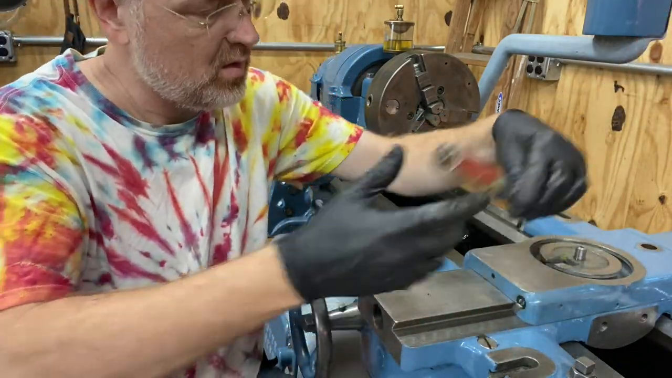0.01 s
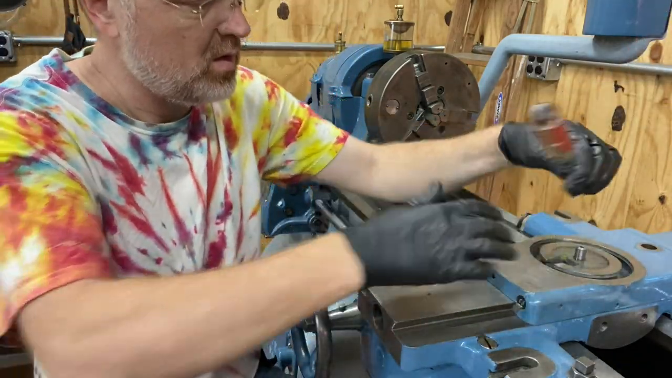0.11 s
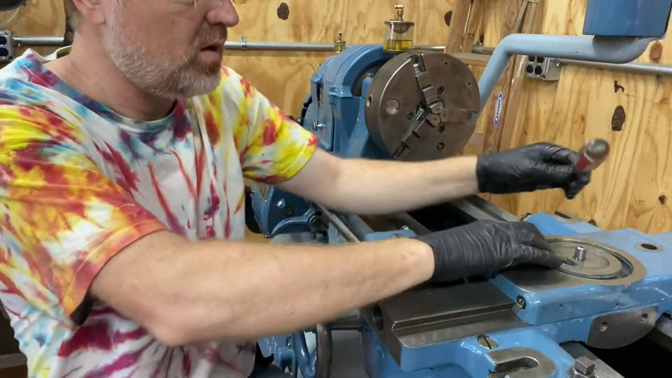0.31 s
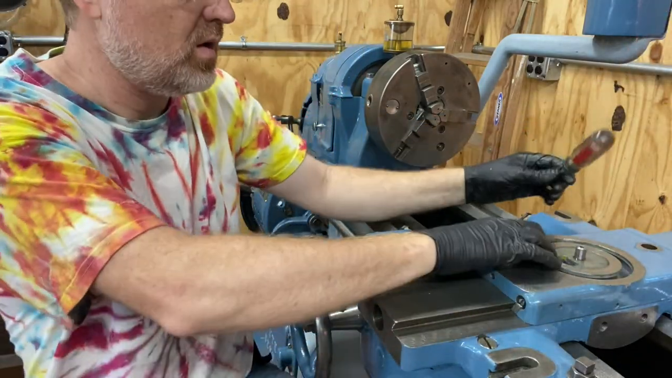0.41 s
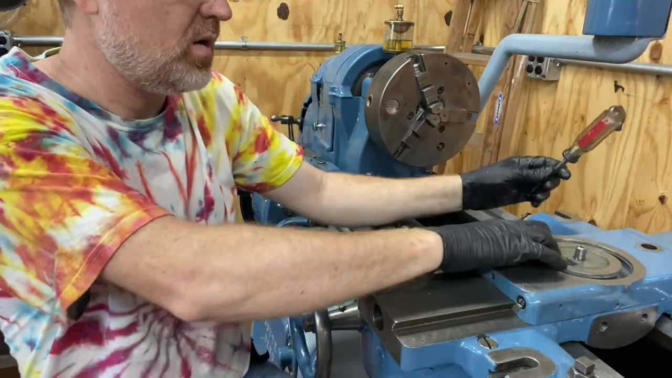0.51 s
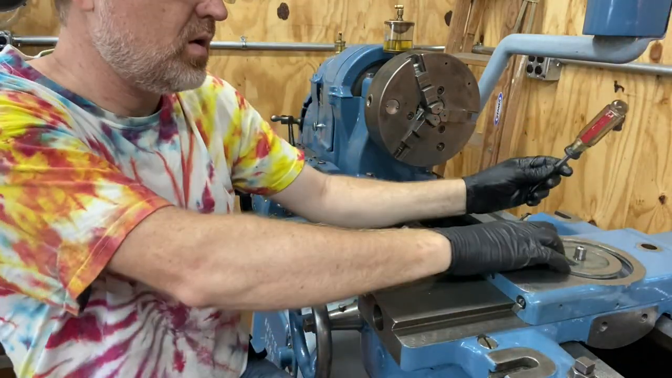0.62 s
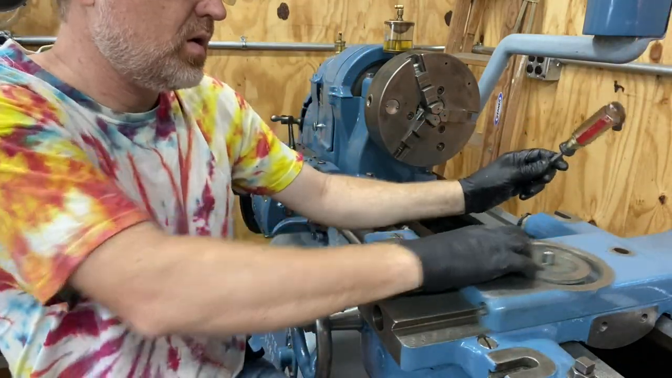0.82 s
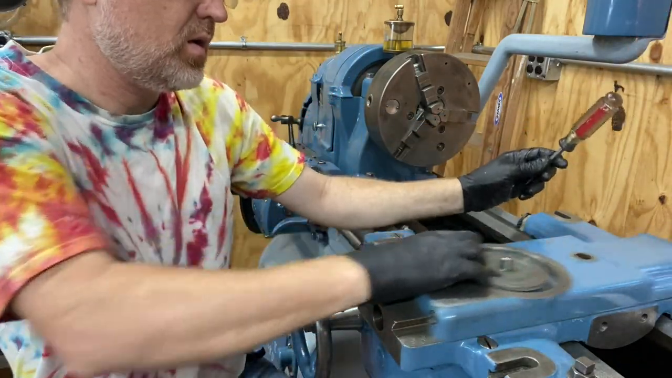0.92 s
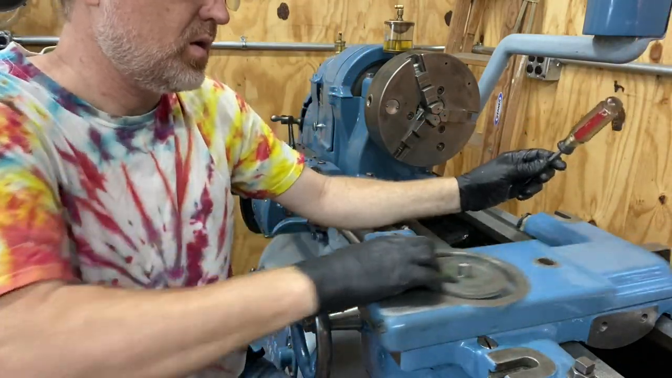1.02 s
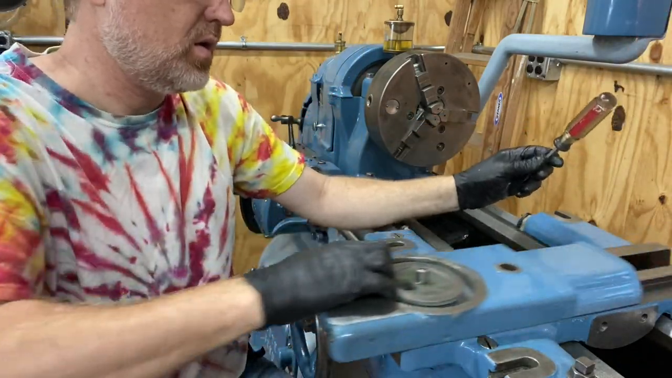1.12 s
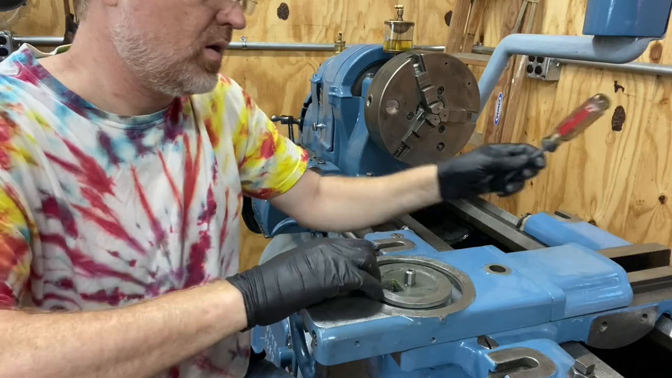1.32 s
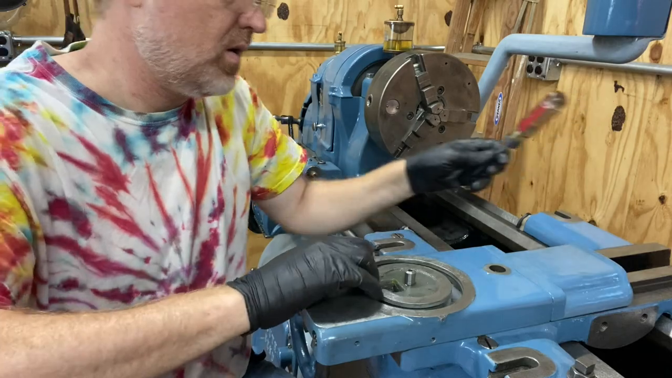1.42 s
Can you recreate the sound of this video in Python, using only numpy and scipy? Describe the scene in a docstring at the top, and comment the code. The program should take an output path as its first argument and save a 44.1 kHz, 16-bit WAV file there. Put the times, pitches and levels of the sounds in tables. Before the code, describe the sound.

A heavy cast-iron slide on a lathe knocks and clunks sharply, judders briefly, then scrapes roughly for half a second and ends in soft dull bumps, picked up close in a small wood-lined workshop.

```python
"""A cast-iron lathe slide is pushed by hand along its ways in a small, wood-lined workshop. It knocks and
clunks hard (decaying noise, a punch tone, ringing modes), then judders (low harmonics). It scrapes for half a
second (noise grains, hissing and exciting modes) with faint squeaks (wavering sines), and bumps softly as it
slows. Damped bed thuds, low rumble and still air (shaped noise) lie underneath; soft, bright swells come and go
(bright grains)."""
import sys
import numpy as np
from scipy import signal
from scipy.fft import rfft, irfft
from scipy.io import wavfile

SR = 44100
rng = np.random.default_rng(int(sys.argv[2]) if len(sys.argv) > 2 else 0)


def master_out(mix):
    """Clip the mix to full scale and print it as 16-bit PCM to the path in sys.argv[1]."""
    frames = np.transpose(np.atleast_2d(mix))
    ceiling = np.clip(frames, -1, 1)
    pcm = np.round(ceiling * 32767).astype(np.int16)
    wavfile.write(sys.argv[1], SR, pcm)


N = 66150
TIME = np.arange(N) / SR  # s

# iron meets iron (time [s], level [dB], brightness: low-pass [Hz], low cut [Hz], clank t60 [s])
KNOCKS = [(.173, -21.5, 1280, 218, 0.13), (.178, -35, 4940, 1500, 0.04), (.2005, -33, 5000, 2500, .015),
          (.205, -19, 674, 102, 0.095), (.2422, -15.5, 4400, 1110, 0.18), (.2485, -3.5, 5040, 640, 0.029),
          (.2505, -0.5, 2460, 520, 0.049), (.2545, 0, 1900, 183, 0.061), (.311, -17, 1500, 130, 0.043),
          (.379, -15, 1870, 865, 0.14), (.393, -13, 1330, 308, .09), (.488, -26, 1800, 153, 0.056),
          (.582, -39, 330, 200, 0.063), (1.019, -14.5, 560, 250, 0.1), (1.045, -14.5, 1670, 1000, 0.066),
          (1.06, -15, 810, 300, 0.043), (1.083, -16, 1000, 556, 0.049), (1.125, -21, 846, 450, 0.082),
          (1.164, -15, 1200, 330, 0.075), (1.19, -20, 600, 110, 0.062), (1.225, -33, 806, 337, 0.051),
          (1.329, -47, 3870, 1880, .03)]
# clear modes of the casting (frequency [Hz], level [dB], t60 [s])
IRON_MODES = [(250.4, -3.5, 0.26), (336, 5, 0.2), (535.4, -9, 0.44), (593, -1, 0.34), (783, -0.5, 0.26),
              (981, -3.5, .2), (1223, -1, 0.18), (1486, -0.5, 0.14), (1746, -4, 0.32), (1904, -0.5, 0.19),
              (2010, -3.5, 0.091), (2256, -2.5, 0.17), (2576, 6.5, .3), (4580, -15, .2)]
# dense, short clank of the casting (frequency [Hz], relative density [dB per Hz])
CLANK_SPECTRUM = [(40, -29), (130, 2), (400, -2.5), (950, -8), (2000, -5.5), (3200, -10.5), (6000, -12.5),
                  (9000, -6.5), (15000, -65)]
# sliding effort (time [s], level [dB])
PUSH = [(.54, -55), (.58, -30), (.65, -14.5), (.705, -5.5), (.79, -2), (.84, -0.5), (.915, -2), (.95, 2),
        (1., -1), (1.05, 1), (1.12, -2.5), (1.16, -17.5), (1.21, -59)]
# hiss of the ways (frequency [Hz], relative density [dB per Hz])
HISS_SPECTRUM = [(300, -25), (1000, -7), (3000, 0), (5000, -1), (8000, -3), (14000, -10), (15500, -24)]
# rasp of the loaded casting (frequency [Hz], relative density [dB per Hz])
RASP_SPECTRUM = [(100, -22), (250, -31), (450, -8), (850, 0), (1600, 2), (2500, -1.5), (3600, -4),
                 (5000, -10), (10000, -21)]
# centre of the broad resonance where the iron bites (time [s], frequency [Hz])
BITE = [(.7, 1580), (.84, 1460), (.89, 1660), (.935, 2970), (.975, 2580), (1.02, 1500), (1.14, 1200)]
# stick-slip groan (harmonic number [1], level [dB])
JUDDER_HARMONICS = [(1, -39.5), (2, -30.5), (3, -43.5)]
# single modes singing in stick-slip
# (start [s], length [s], pitch [Hz], sag [Hz per s], level [dB], rms waver [share of pitch])
SQUEAKS = [(.82, .04, 855, 200, -48, .04), (.835, .06, 1290, 0, -53, .035),
           (.922, .035, 2460, 300, -47, .014), (.925, .05, 4380, 300, -55, .008),
           (.985, .04, 2440, 300, -49, .014), (1.025, .05, 1285, 200, -45, .04),
           (1.04, .04, 1560, 100, -46, .035), (1.312, .108, 4230, 600, -69, .01),
           (1.42, .09, 4030, 400, -73, .01)]
# soft, bright swells (start [s], length [s], level [dB])
SWELLS = [(-.04, 0.11, -61.5), (0.191, 0.11, -47.5), (0.273, 0.34, -62.5), (.56, 0.074, -63),
          (1.216, 0.12, -60.5)]
# colour of the bright swells (frequency [Hz], relative density [dB per Hz])
SWELL_SPECTRUM = [(1000, -21.5), (3000, 1.5), (6000, -1.5), (9000, 1.5), (12500, -4), (15500, 4.5)]
# the bed shakes on its stand (time [s], frequency [Hz], level [dB], rise [s], t60 [s])
THUDS = [(0.178, 352, -34.5, 0.0039, 0.097), (.18, 153, -46.5, 0.0031, 0.26),
         (0.207, 57.6, -39.5, 0.013, 0.34), (0.258, 124.5, -10, 0.0043, 0.043),
         (0.285, 50.4, -32, 0.0036, 0.24), (0.313, 75.4, -35, 0.011, 0.14), (0.49, 95.3, -52, 0.0073, 0.3),
         (0.574, 98.3, -50, 0.0088, 0.33), (1.025, 336, -33.5, 0.0032, 0.062),
         (1.074, 253.5, -37, 0.0066, 0.22), (1.11, 83.6, -47, 0.0091, 0.15),
         (1.165, 401, -44.5, 0.0025, 0.14), (1.188, 120, -31.5, 0.0021, 0.044),
         (1.238, 112, -42, 0.0033, 0.23), (1.259, 65.5, -45.5, .015, 0.35)]
# rumble of the moving slide (time [s], level [dB])
RUMBLE_LEVEL = [(0, -76), (.17, -71.5), (.21, -57), (.3, -37.5), (.42, -41.5), (.55, -55), (.63, -59),
                (.71, -79), (.82, -52), (.92, -70.5), (1.02, -58.5), (1.13, -50.5), (1.26, -53.5),
                (1.38, -69.5), (1.44, -66), (1.5, -72)]
# rumble colour (frequency [Hz], relative density [dB per Hz])
RUMBLE_SPECTRUM = [(20, -9), (50, -2.5), (105, 1), (160, -8.5), (240, -5.5), (400, -26), (1000, -26),
                   (4000, -106)]
# still air of the shop (frequency [Hz], relative density [dB per Hz])
AIR_SPECTRUM = [(25, -2), (90, -2), (200, -16), (600, -16.5), (1500, -22), (3200, -17), (5500, -25.5),
                (14000, -26.5)]
# decay of the shop (frequency [Hz], t60 [s])
ROOM_T60 = [(60, 0.46), (250, 0.37), (700, 0.39), (2000, 0.58), (4500, 0.57), (9000, 0.61), (15000, 0.15)]
# left-right likeness of diffuse sound (frequency [Hz], correlation [1])
ALIKE = [(50, 1), (150, 0.59), (300, 0.8), (700, 0.084), (2000, 0.13), (15000, 0.093)]

IRON_DB, CLANK_DB, KNOCK_ROOM_DB = -39, -13.5, -1
PUNCH_HZ, PUNCH_DB, PUNCH_T60_S = 877, -9.5, 0.0091
CRACK_DB, CRACK_T60_S = -32, 0.016
CONTACT_CYCLES = 1.47  # rise time constant in cycles of the brightness: duller contacts build up more slowly
HISS_DB, RASP_DB, SCRAPE_ROOM_DB = -50, -45.5, -4
RASP_GROWTH_DB_PER_DB = 1.79  # rasp level per push level
UNEVEN_HZ, UNEVEN_RMS_DB = 31, 0.09
SLIP_HZ, SLIP_RMS_DB, RASP_T60_S = 170, 1.8, 0.045
GRAINS_PER_S, GRAIN_SPREAD_DB = 7000, 2
BITE_WIDTH_HZ, BITE_GAIN_DB = 1200, -3
JUDDER_HZ, JUDDER_START_S, JUDDER_LENGTH_S, JUDDER_ROOM_DB = 122, 0.409, 0.051, -5.5
WAVER_HZ = 171
THUD_ROOM_DB, AIR_DB = -6.5, -64.5
RIGHT_DB, LEFT_LAG_S = 0.86, 0.00027
ROOM_DELAY_S = 0.004
LOW_CUT_HZ, EDGE_HZ = 24, 15300


def amp(db):
    """Decibels to gain."""
    return 10 ** (np.asarray(db) / 20)


def unit(x):
    """Scales to rms 1."""
    return x / np.sqrt(np.mean(x ** 2) + 1e-20)


def read(points, hz):
    """Reads a table on a log-frequency axis."""
    f, value = np.transpose(points)
    return np.interp(np.log(hz + 1), np.log(f + 1), value)


def follow(points):
    """Reads a control curve at every sample."""
    return np.interp(TIME, *np.transpose(points))


def delayed(x, delay_s):
    """Starts a sound delay_s later, within the scene's length."""
    silence = np.zeros(x.shape[:-1] + (max(round(delay_s * SR), 0),))
    return np.concatenate([silence, x], -1)[..., :N]


def dying(t60_s):
    """Exponential decay by 60 dB in t60_s."""
    return np.exp(-np.log(1000) * TIME / t60_s)


def half_sine(start_s, length_s):
    """Half-sine swell, zero outside its length."""
    return np.sin(np.pi * np.clip((TIME - start_s) / length_s, 0, 1))


def cut(x, hz, kind, order=2):
    """Butterworth low-pass or high-pass."""
    corner_hz = np.clip(hz, 10, SR / 2 - 100)
    return signal.sosfilt(signal.butter(order, corner_hz, kind, fs=SR, output="sos"), x)


def slow_noise(hz):
    """Random fluctuation below hz, at rms 1."""
    return unit(cut(rng.standard_normal(N), hz, "low"))


def colour(x, spectrum):
    """Weights a signal by a spectrum, at rms 1."""
    gain = amp(read(spectrum, np.fft.rfftfreq(N, 1 / SR)))
    return unit(irfft(rfft(x) * gain, N))


def diffuse():
    """Stereo noise whose left-right likeness varies with frequency."""
    a, b = rfft(rng.standard_normal((2, N)))
    same = np.clip(read(ALIKE, np.fft.rfftfreq(N, 1 / SR)), -1, 1)
    mid = a * np.sqrt((1 + same) / 2)
    side = b * np.sqrt((1 - same) / 2)
    return irfft(np.array([mid + side, mid - side]), N)


def from_right(x):
    """A small source to the right reaches the left channel a little later."""
    return np.array([delayed(x, LEFT_LAG_S), x])


def in_shop(x, room_db):
    """Adds to a stereo sound a diffuse tail that dies band by band."""
    hz, t, bands = signal.stft(diffuse()[:, :N // 2], SR, nperseg=256)
    decay = amp(-60 * t / read(ROOM_T60, hz)[:, None])
    tail = signal.istft(bands * decay, SR, nperseg=256)[1]
    tail = delayed(tail / np.linalg.norm(tail[0]), ROOM_DELAY_S)
    return x + amp(room_db) * signal.fftconvolve(x, tail, axes=1)[:, :N]


def resonate(x, hz, width_hz):
    """A one-pole resonance of peak gain 1 that follows the curve hz."""
    turn = np.exp(2j * np.pi * np.cumsum(hz) / SR)
    r = np.exp(-np.pi * width_hz / SR)
    # shift the centre to 0 Hz, low-pass, shift back
    return 2 * (turn * signal.lfilter([1 - r], [1, -r], x / turn)).real


def casting_ring():
    """The casting's clear modes ring as decaying sines."""
    lean = (rng.random(len(IRON_MODES)) - .5) * np.pi / 2  # modes reach the two sides out of step
    modes = np.array([amp(db) * dying(t60_s) * np.exp(2j * np.pi * hz * TIME)
                      for hz, db, t60_s in IRON_MODES])
    return amp(IRON_DB) * (np.exp(1j * np.array([lean, -lean])) @ modes).imag


def knocks():
    """Each contact cracks, punches and clanks, and rings the casting; each has its own brightness."""
    out = np.zeros((2, N))
    ring = casting_ring()
    punch = amp(PUNCH_DB) * dying(PUNCH_T60_S) * np.sin(2 * np.pi * PUNCH_HZ * TIME)
    for s, db, bright_hz, low_hz, t60_s in KNOCKS:
        rise = 1 - np.exp(-TIME * bright_hz / CONTACT_CYCLES)
        clank = amp(CLANK_DB) * colour(diffuse(), CLANK_SPECTRUM) * dying(t60_s)
        crack = amp(CRACK_DB) * rng.standard_normal(N) * dying(CRACK_T60_S)
        body = cut(rise * (clank + from_right(punch) + ring), bright_hz, "low", order=3)
        edge = from_right(cut(rise * crack, bright_hz, "low", order=1))
        out += amp(db) * delayed(cut(body + edge, low_hz, "high"), s)
    return in_shop(out, KNOCK_ROOM_DB)


def scrape():
    """Friction hisses directly and, with more push, rasps the casting in uneven slips."""
    push_db = follow(PUSH) + UNEVEN_RMS_DB * slow_noise(UNEVEN_HZ)
    hiss = from_right(amp(HISS_DB + push_db) * colour(grains(), HISS_SPECTRUM))
    slips = amp(SLIP_RMS_DB * slow_noise(SLIP_HZ))
    rasp_gain = amp(RASP_DB + RASP_GROWTH_DB_PER_DB * push_db)
    body = rasp(rasp_gain * unit(slips * grains()))
    bite = amp(BITE_GAIN_DB) * resonate(body, follow(BITE), BITE_WIDTH_HZ)
    return in_shop(hiss + body + bite, SCRAPE_ROOM_DB)


def rasp(drive, count=20):
    """The casting's many close modes, radiated by its whole surface, change as the slide travels."""
    out = np.zeros((2, N))
    envelope = dying(RASP_T60_S) - dying(RASP_T60_S / 10)
    position = np.linspace(0, count - 1, N)
    for k in range(count):
        near = np.cos(np.pi / 2 * np.clip(position - k, -1, 1))  # cross-fade between responses
        casting = (colour(diffuse(), RASP_SPECTRUM) * envelope)[:, :N // 10]
        casting /= np.linalg.norm(casting[0])
        out += signal.oaconvolve((near * drive)[None], casting, axes=1)[:, :N]
    return out


def grains():
    """Tiny high spots catch at random, a few larger than the rest."""
    size = amp(GRAIN_SPREAD_DB * np.minimum(rng.exponential(1, N), 5))
    return size * rng.standard_normal(N) * (rng.random(N) < GRAINS_PER_S / SR)


def judder():
    """The slide sticks and slips for a moment: a short low harmonic groan."""
    groan = sum(amp(db) * np.sin(2 * np.pi * round(k) * JUDDER_HZ * TIME) for k, db in JUDDER_HARMONICS)
    return in_shop(from_right(half_sine(JUDDER_START_S, JUDDER_LENGTH_S) * groan), JUDDER_ROOM_DB)


def squeaks():
    """Stick-slip makes single modes sing: faint, wavering tones, most sagging in pitch."""
    out = np.zeros(N)
    for s, length_s, top_hz, sag_hz_per_s, db, waver in SQUEAKS:
        swell = np.sqrt(abs(half_sine(s, length_s)))
        hz = (top_hz - sag_hz_per_s * (TIME - s)) * (1 + waver * slow_noise(WAVER_HZ))
        out += amp(db) * swell * np.sin(2 * np.pi * np.cumsum(hz) / SR)
    return in_shop(from_right(out), SCRAPE_ROOM_DB)


def swells():
    """Soft, bright swells of grains."""
    level = sum(amp(db) * half_sine(s, length_s) for s, length_s, db in SWELLS)
    return from_right(level * colour(grains(), SWELL_SPECTRUM))


def thuds():
    """Low, damped swings of the bed as the slide's weight shifts."""
    swings = np.zeros(N)
    for s, hz, db, rise_s, t60_s in THUDS:
        envelope = (1 - np.exp(-(TIME / rise_s) ** 2)) * dying(t60_s)
        swings += delayed(amp(db) * envelope * np.sin(2 * np.pi * hz * TIME), s)
    return in_shop(from_right(swings), THUD_ROOM_DB)


def rumble():
    """Low noise of the moving slide, following a level curve."""
    return amp(follow(RUMBLE_LEVEL)) * colour(diffuse(), RUMBLE_SPECTRUM)


def air():
    """Still air of the shop: steady shaped noise."""
    return amp(AIR_DB) * colour(diffuse(), AIR_SPECTRUM)


def scene():
    """The slide, slightly to the right, over the bed's thuds, the rumble and the air."""
    slide = knocks() + scrape() + judder() + squeaks() + swells()
    return slide * amp([[-RIGHT_DB], [RIGHT_DB]]) + thuds() + rumble() + air()


def record(dry):
    """The recorder's low cut and band limit."""
    band_limit = signal.firwin(255, EDGE_HZ, window=("kaiser", 9), fs=SR)
    return signal.oaconvolve(cut(dry, LOW_CUT_HZ, "high"), band_limit[None], "same")


dry = scene()
out = record(dry)
master_out(out)
```